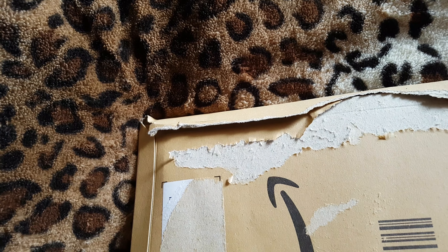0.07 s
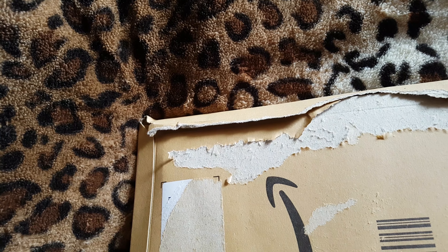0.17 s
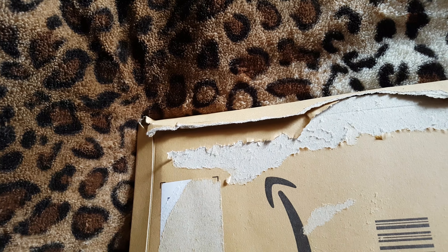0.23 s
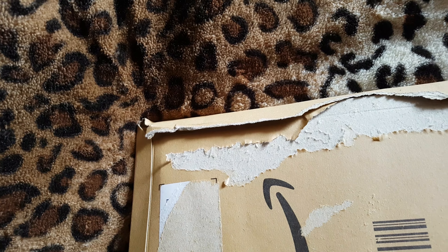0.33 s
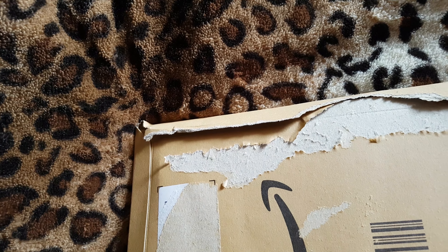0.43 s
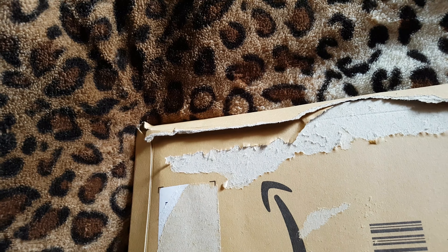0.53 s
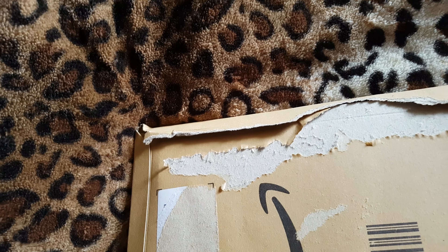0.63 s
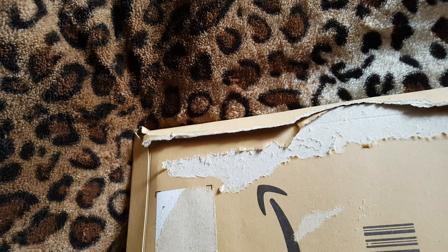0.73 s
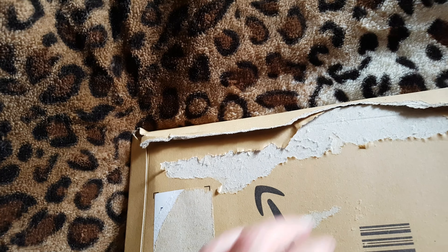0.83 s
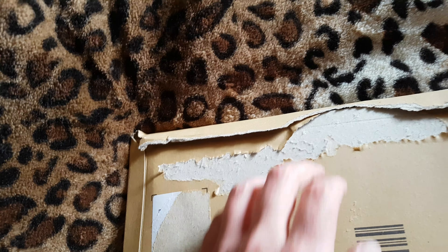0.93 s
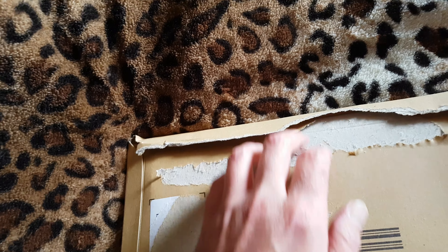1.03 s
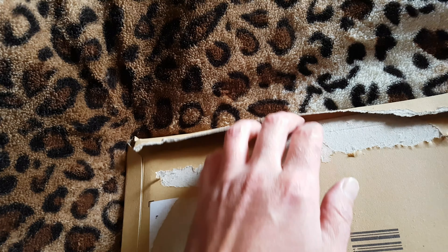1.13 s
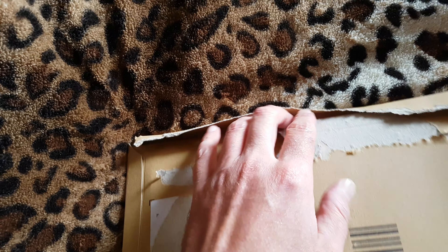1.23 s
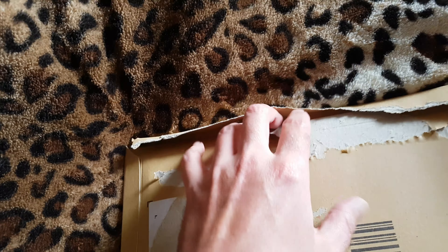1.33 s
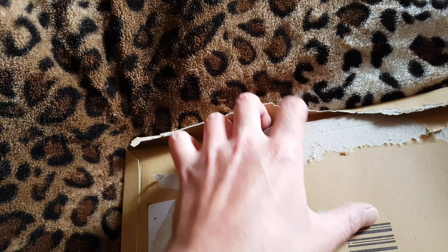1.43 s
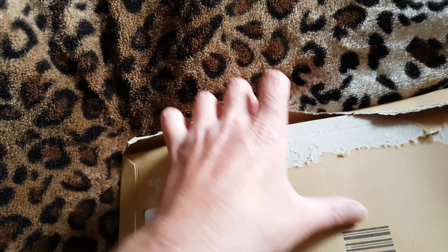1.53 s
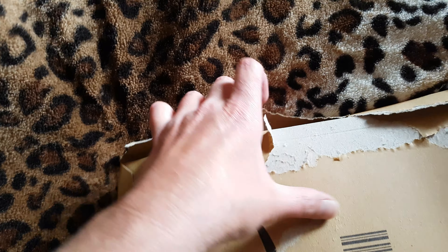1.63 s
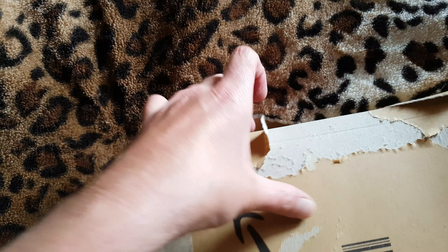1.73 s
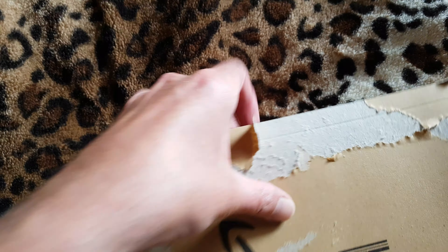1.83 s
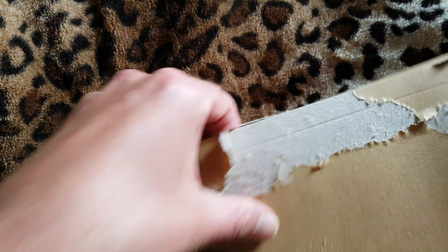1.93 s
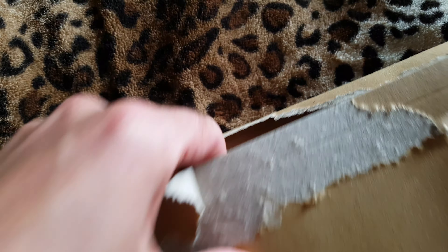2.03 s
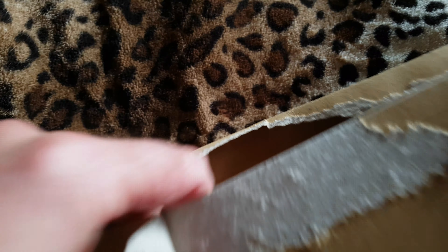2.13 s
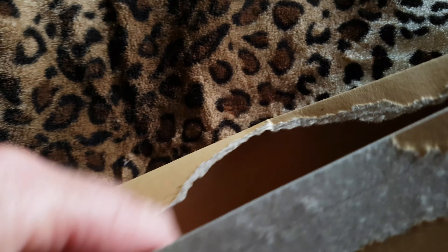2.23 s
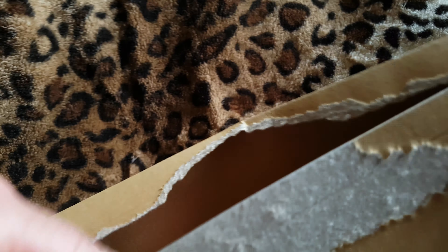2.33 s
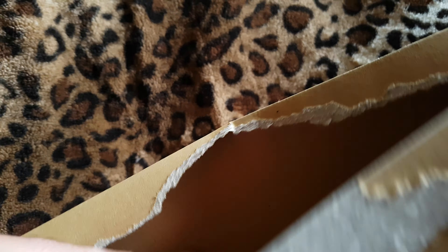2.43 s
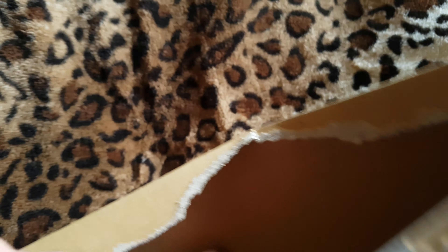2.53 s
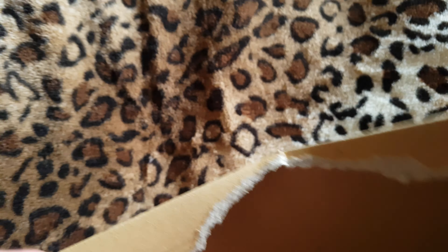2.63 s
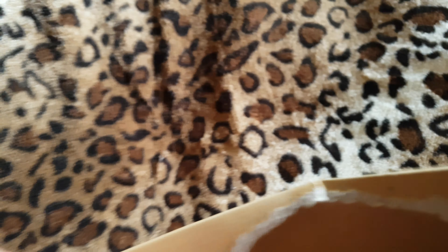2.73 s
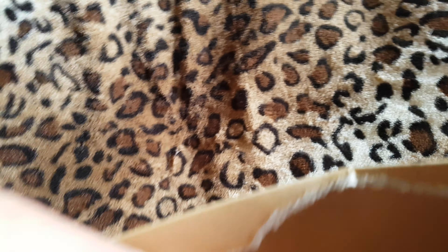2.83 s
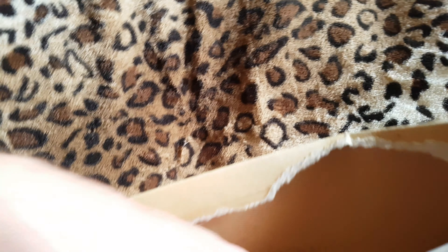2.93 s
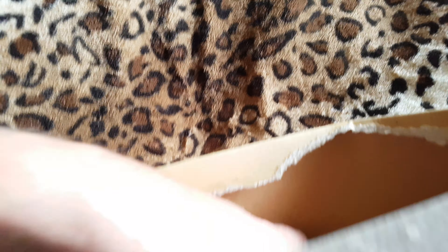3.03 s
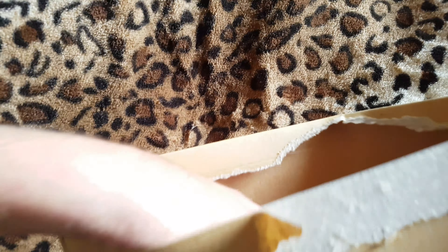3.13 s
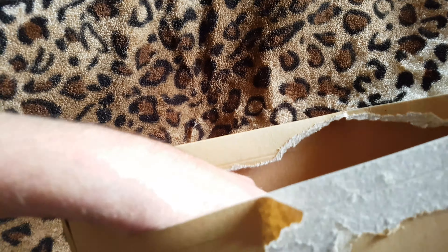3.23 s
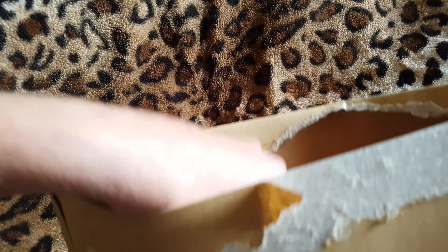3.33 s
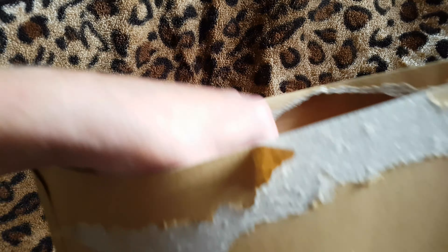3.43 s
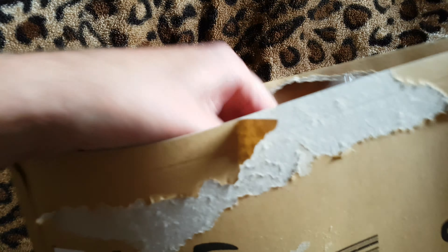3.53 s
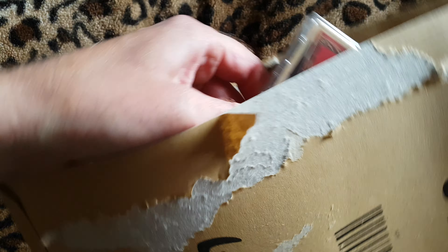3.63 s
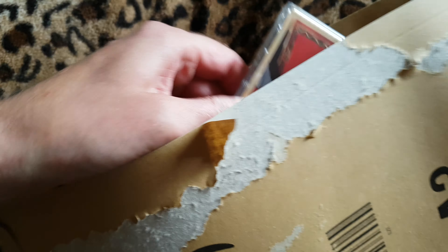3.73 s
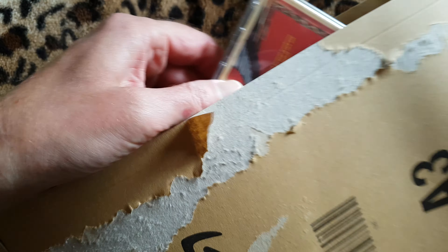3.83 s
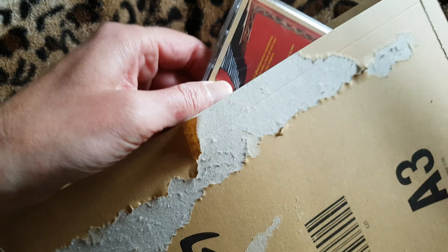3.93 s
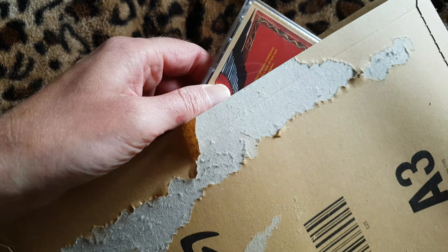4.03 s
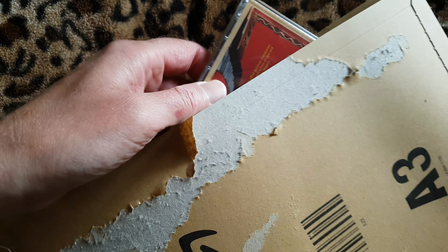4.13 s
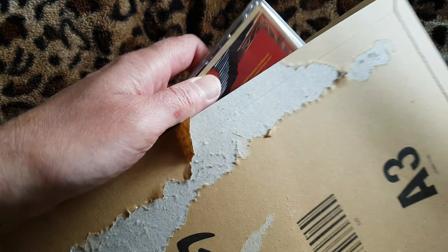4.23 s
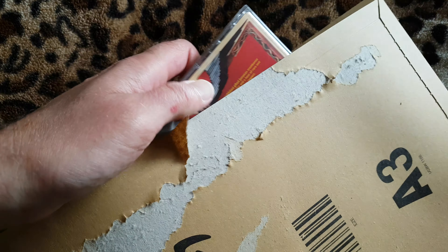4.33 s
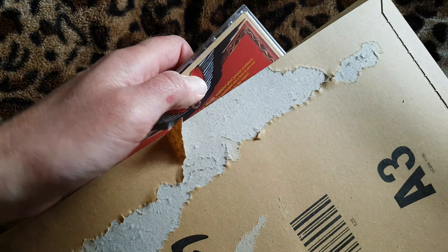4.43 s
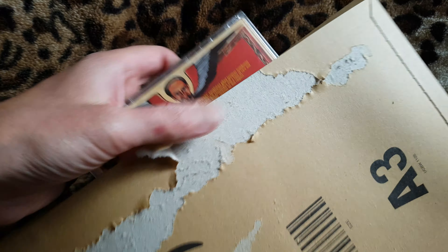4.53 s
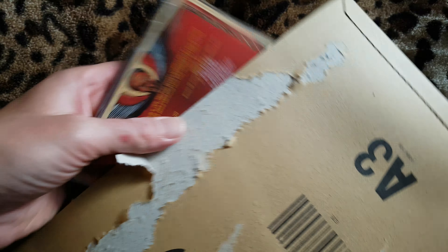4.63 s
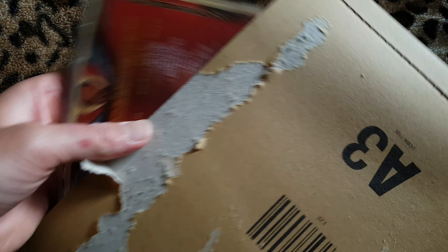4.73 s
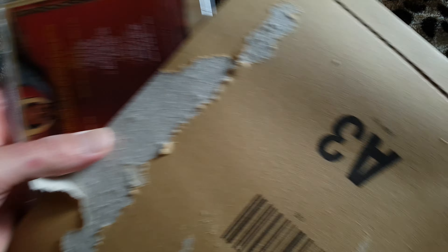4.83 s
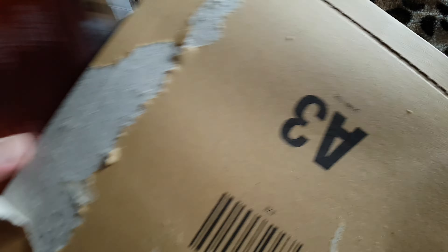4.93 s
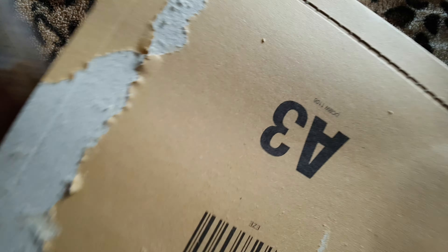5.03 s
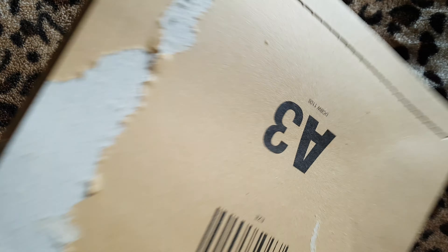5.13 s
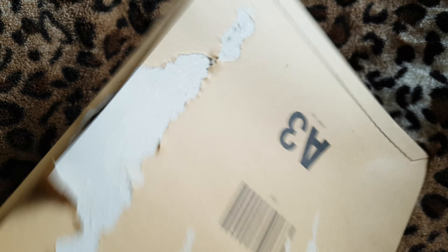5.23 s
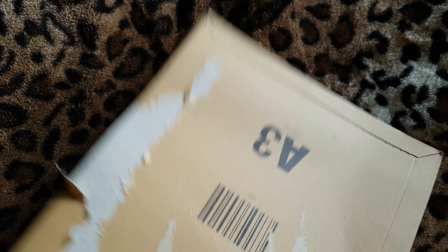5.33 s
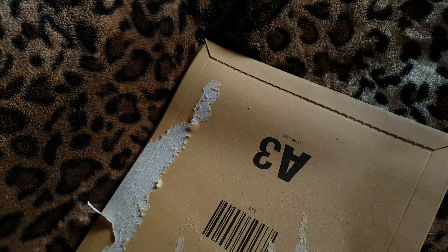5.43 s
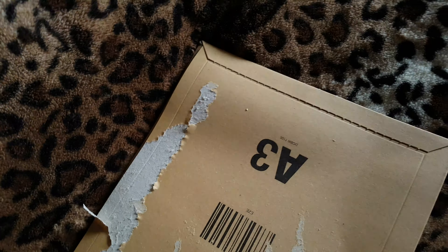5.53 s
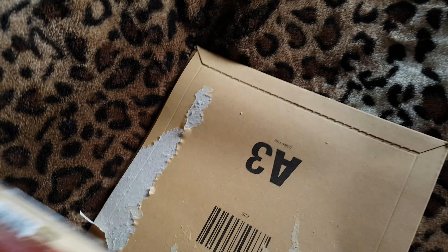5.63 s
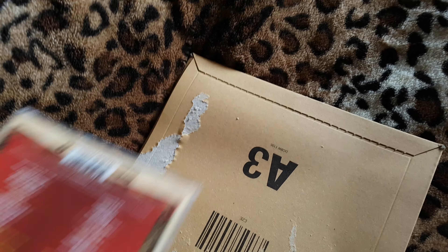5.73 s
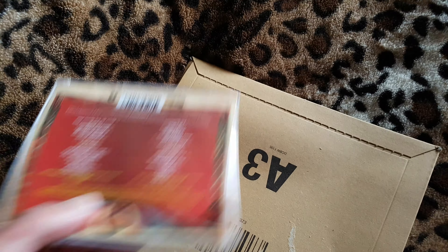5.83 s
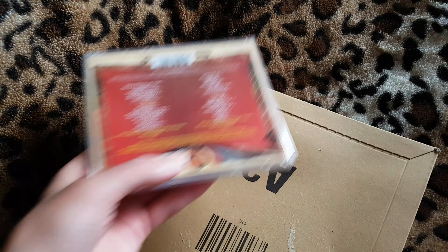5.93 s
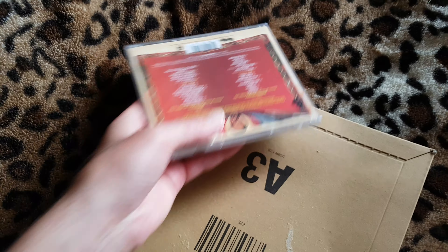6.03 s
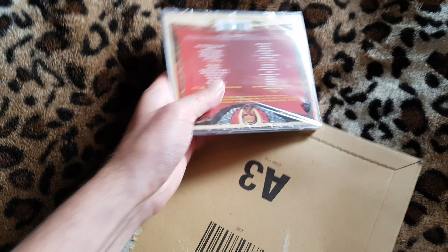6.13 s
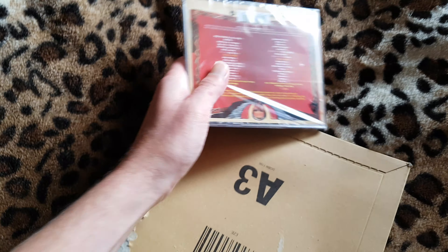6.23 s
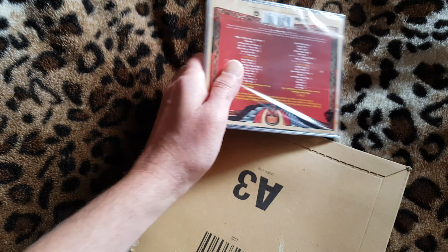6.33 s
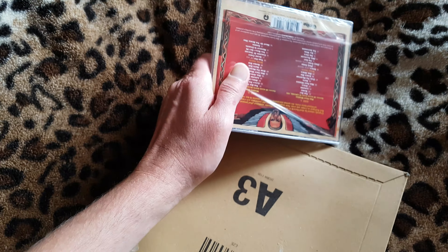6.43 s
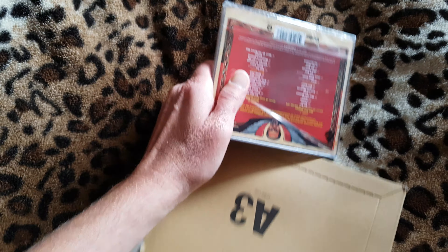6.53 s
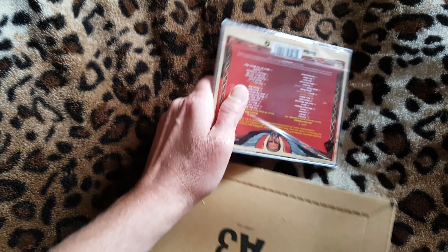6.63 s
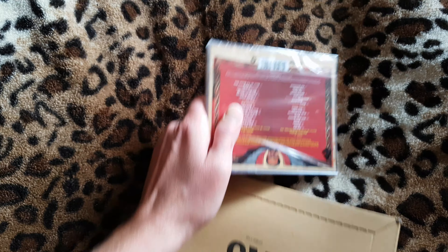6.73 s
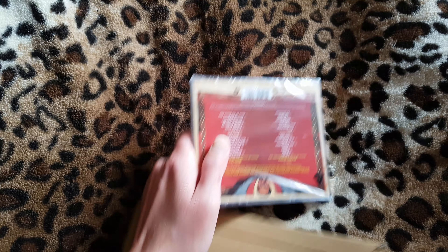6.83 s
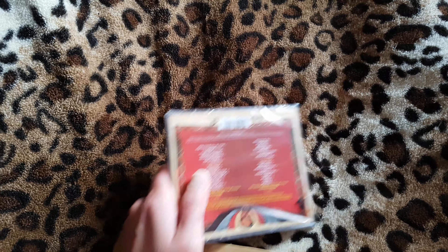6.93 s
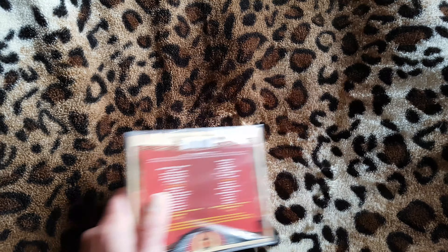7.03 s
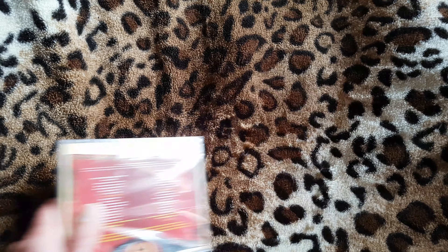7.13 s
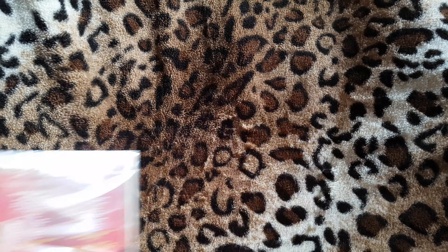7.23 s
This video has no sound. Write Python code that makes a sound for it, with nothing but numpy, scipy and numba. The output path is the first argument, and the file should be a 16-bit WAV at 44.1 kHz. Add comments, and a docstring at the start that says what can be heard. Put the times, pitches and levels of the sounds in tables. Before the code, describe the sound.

Dry cardboard rasps, hollow creaks and pops close up as a hand empties a stiff mailer, followed by light plastic film ticks in a quiet room.

```python
"""In a quiet room, a phone close to a blanket: a hand opens a torn cardboard mailer, slides out a film-wrapped
plastic case and lays both down. Room tone, hiss and a faint hum lie behind. Skin and case scrape the card as
stick-slip noise through its resonances; the card buckles and knocks as decaying modes with cracks; film and
paper edges tick as short treble bursts. A thin scratch comes before the hand; a short room tail follows all."""
import sys
import numpy as np
from scipy import signal
from scipy.fft import rfft, irfft, next_fast_len
from scipy.io import wavfile
from scipy.ndimage import uniform_filter1d
from numba import njit

SR = 44100
rng = np.random.default_rng(int(sys.argv[2]) if len(sys.argv) > 2 else 0)


def master_out(mix):
    """Clip the mix to full scale and print it as 16-bit PCM to the path in sys.argv[1]."""
    frames = np.transpose(np.atleast_2d(mix))
    ceiling = np.clip(frames, -1, 1)
    pcm = np.round(ceiling * 32767).astype(np.int16)
    wavfile.write(sys.argv[1], SR, pcm)


N = 321045
ALIKE_HZ = 1190  # above this the two microphone ports hear different parts of the card


def undb(db):
    """Decibels to gain."""
    return 10 ** (np.asarray(db) / 20)


def unit(x):
    """Scale to rms 1."""
    return x / np.sqrt(np.mean(x ** 2))


def curve(table):
    """Columns of a table, interpolated to one value a sample."""
    s, *columns = np.transpose(table)
    return [np.interp(np.arange(N) / SR, s, c) for c in columns]


def smooth(ms):
    """Millisecond values to one a sample."""
    return np.interp(np.arange(N) / SR, np.arange(len(ms)) / 1000, ms)


def walk(rate):
    """Random levels held 1 / rate s and slewed; spread near 1."""
    k = int(SR / rate)
    steps = np.repeat(rng.standard_normal(N // k + 1), k)
    return 1.09 * uniform_filter1d(steps, k)[:N]


def band(x, lo_hz, hi_hz, order=2):
    """Band-pass."""
    return signal.sosfilt(signal.butter(order, [lo_hz, hi_hz], "band", fs=SR, output="sos"), x)


def colour(x, points):
    """Shape dense noise by (Hz, dB) points, nearly silent outside them; rms 1."""
    hz, db = np.transpose(points)
    size = next_fast_len(N, True)
    f = np.arange(size // 2 + 1) * SR / size + 1
    gain = undb(np.interp(np.log(f), np.log(hz), db, -120, -120))
    return unit(irfft(rfft(x, size) * gain, size)[:, :N])


@njit
def svf(x, hz, width):
    """State-variable band-pass whose centre moves."""
    y, b, l = np.empty(len(x)), 0., 0.
    for i in range(len(x)):
        g, k = np.tan(np.pi * hz[i] / SR), width / hz[i]
        v = (b + g * (x[i] - l)) / (1 + g * (g + k))
        b, l, y[i] = 2 * v - b, l + 2 * g * v, k * v
    return y


def resonance(rub, hz, width_hz):
    """A steep moving resonance: two equal band-passes in a row; rms 1."""
    return unit(np.array([svf(svf(c, hz, width_hz), hz, width_hz) for c in rub]))


def ports(mid, side, alike_hz=ALIKE_HZ):
    """Left and right from two unrelated noises: nearly the same in the bass, unrelated in the treble."""
    high = signal.sosfilt(signal.butter(3, alike_hz, "high", fs=SR, output="sos"), side)
    side = high + 0.11 * side
    return np.array([mid + side, mid - side])


def pan(db):
    """Gains of left and right, from left minus right in dB."""
    return undb(np.array([db, -db]) / 2)


def slips(rate, spread_db, last_s, steady):
    """Envelope of stick-slip: random catches of uneven size that load and let go, over a steady drag."""
    catch = (rng.random(N) < rate / SR) * undb(spread_db * rng.standard_normal(N))
    t = np.arange(-.03, .03, 1 / SR)
    return unit(signal.fftconvolve(catch, np.exp(-np.abs(t) / last_s), "same") + steady)


def swells(s, db, rise_s, fall_s):
    """Power of each stroke, one value a millisecond: it climbs to its top and drops away."""
    late = np.arange(0, N / SR, .001) - s[:, None]
    far = np.where(late < 0, -late / rise_s[:, None], late / fall_s[:, None])
    # a bend above 1 gives a rounded top and steep ends
    return undb(2 * (db[:, None] - 20 * far ** 1.35))


def add(out, s, sound):
    """Mix a short sound in at time s."""
    i = int(s * SR)
    out[:, i:i + sound.shape[1]] += sound[:, :N - i]


def burst(t, lo_hz, hi_hz, t60, rise_s):
    """A puff of band noise that rises and decays, rms near 1 at its top."""
    shape = (1 - np.exp(-t / rise_s)) * 1000 ** (-t / t60)
    return unit(band(rng.standard_normal((2, len(t))), lo_hz, hi_hz)) * shape / shape.max()


# Room tone and microphone hiss behind everything. Each row: frequency in Hz, relative level in dB per Hz.
ROOM_SPECTRUM = [(20, -21.5), (30, -13), (55, -14), (110, -6), (170, -12), (300, -9.5), (1000, -12.5),
                 (2200, -15.5), (4000, -25.5), (7500, -31.5), (13000, -27.5), (16500, -23)]
ROOM_DB = -66.8
HUM_HZ, HUM_DB = 73, -81  # centres of its wandering pitch and amplitude


def room():
    """Steady noise of room and microphone, partly alike in the bass, with a faint wavering hum in the house."""
    mid, side = rng.standard_normal((2, N))
    noise = ports(mid, .6 * side, alike_hz=161.7) + .3 * np.array([side, -side])
    tone = colour(noise, ROOM_SPECTRUM)
    hum_hz = HUM_HZ * (1 + 0.055 * walk(9.6))
    hum = np.sin(2 * np.pi * np.cumsum(hum_hz) / SR) * undb(HUM_DB + 2.0 * walk(4))
    return undb(ROOM_DB) * tone + hum


ECHO_DB, ECHO_T60_S = -15, 0.057


def echo(x):
    """Short damped tail of a furnished room: decaying noise, nearly alike at both ports in the bass."""
    t = np.arange(int(.4 * SR)) / SR
    noise = band(ports(*rng.standard_normal((2, len(t)))), 130, 7500, order=1)
    tail = noise * 1000 ** (-t / ECHO_T60_S) * (t > .004)
    tail = tail / np.sqrt((tail ** 2).sum() / 2)
    return undb(ECHO_DB) * signal.fftconvolve(x, tail, axes=1)[:, :N]


# A faint thin scratch before the hand comes to the mailer.
# Each row: strongest moment in seconds, level in dB, 20 dB rise in seconds, 20 dB fall in seconds.
SCRATCH_STROKES = [(.17, -64, .033, .012), (.26, -66, .03, .1), (.314, -54, .07, .02)]
SCRATCH_HZ = 3400.


def scratch():
    """Short grainy patches: stick-slip noise through a fixed narrow band."""
    grain = slips(200, 5.1, 0.0011, steady=0.57) * rng.standard_normal((2, N))
    rasp = unit(np.array([svf(c, np.full(N, SCRATCH_HZ), 480.0) for c in grain]))
    power = swells(*np.transpose(SCRATCH_STROKES)).sum(axis=0)
    return rasp * smooth(np.sqrt(power))


# Film and paper edges tick close to the microphone.
# Each row: start in seconds, level in dB before a common trim, lower part in dB re that level before its
# own trim, left minus right in dB.
FILM_TICKS = [(1.1263, -49, -6, -6.0), (1.1378, -30, 7, -6.5), (1.168, -34, -8, -11), (1.261, -38, 0, 2),
              (2.1298, -42, 15, -4.0), (2.152, -36, 17.5, -3), (2.214, -31.5, -1, -2.0),
              (2.4486, -41.5, 14, -0.5), (2.509, -37, 8, 11), (2.5663, -38, 6, -5), (2.7347, -29, 0, 2.0),
              (2.7486, -28.5, 13, -2), (2.76, -28, 5, 3), (2.8744, -39, -5, -1.5), (2.8838, -31, -8, 2),
              (2.9025, -28.5, 2, 3), (2.9367, -40.5, 23.5, -1), (2.962, -29, -1, -2.0),
              (3.0547, -32.5, 1, -7), (3.5299, -42, -8, -0.5), (3.6356, -43, 5, 4), (3.8932, -29.5, 7.5, 0),
              (4.1828, -46, -13, 3), (4.207, -42, 0, 8), (4.2203, -39, -3, 8), (4.288, -34.5, -1, 4),
              (4.347, -38, 1, 1.5), (4.3695, -32.5, 5, 3), (4.3919, -41, -16, -3), (4.411, -43, -13, -0.5),
              (4.5136, -37, -16, 1), (4.588, -31, 1, -2), (4.6155, -33, -14, -3), (4.6468, -36, 1, 0.5),
              (4.6835, -36, 10, -3), (4.7601, -40.5, -12, -0.5), (4.823, -35, -1, -1.0),
              (4.855, -44, -10, 0), (4.913, -45, -10, 0), (4.921, -45, -10, 0), (4.939, -43, -8, 0),
              (5.077, -38, 7, 7), (5.1682, -36, -12, 4.0), (5.249, -43, -5, 8), (5.2623, -39, -3, 8),
              (5.3926, -50.5, 2, 1), (5.4455, -41, 3, 3.5), (5.4934, -36, -5, 5), (5.5413, -39.5, -1, 0),
              (5.59, -52, 8, 0), (5.6294, -38, 1.5, 0.5), (5.7357, -40, -5.5, -1.5), (5.7813, -44.5, 0, -3),
              (5.8215, -41, 4.5, 0.5), (5.833, -48, 8, 0), (5.863, -45, 5, -1), (5.888, -50, 10, 0),
              (6.027, -50, 6, -11.5), (6.0386, -42, -4, -6), (6.0794, -34, -10, 4), (6.0843, -29, -10, -8),
              (6.113, -40, -3, -4), (6.1357, -31.5, 0, -5), (6.1426, -34, -5, -7), (6.1659, -29.5, 8, 1),
              (6.233, -33.5, -2, -5), (6.348, -37.5, -3, -2), (6.6283, -44, 0, -2.5),
              (6.7778, -42.5, -5, -8.5), (6.8139, -30, -5, -6), (6.8568, -44, -11, 0), (6.902, -38, -3, -9),
              (7.2654, -36.5, -19, -2.5)]


def ticks():
    """Creases snap: a few milliseconds of treble with a duller part."""
    out, t = np.zeros((2, N)), np.arange(int(.03 * SR)) / SR
    for s, level_db, low_db, pan_db in FILM_TICKS:
        treble = burst(t, 7500, 19845, 0.0076, 0.0016)
        dull = burst(t, 1150, 3380, 0.011, 0.0025)
        snap = treble + undb(low_db - 2) * dull
        add(out, s, undb(level_db - 9.5) * pan(pan_db)[:, None] * snap)
    return out


# The card panel's modes, rubbed or struck. Each row: frequency in Hz before bending, relative level in dB,
# decay as a share of the given ring time.
CARD_MODES = [(127, -8.5, 1.27), (161.5, -5, 0.92), (236, -6.5, 1.1), (317, -5.5, 1.5), (484.6, 1.5, 0.59),
              (645.6, 3, 0.6), (815, -5.5, 0.79), (1111, -0.5, 0.85), (1238, 3, 0.45), (1568, -12.5, 1.9),
              (2090, 5.5, 0.4), (2537, 0.5, 0.4), (3460, -17, 0.42), (4100, -13, 0.16), (5060, -9, .4)]


def panels(rub, lo_hz, hi_hz, t60, turns_db):
    """Rubbing rings the card's modes; bending shifts each mode and the grip damps it by turns."""
    out = 0
    modes = [m for m in CARD_MODES if lo_hz < m[0] < hi_hz]
    for k, (hz, db, share) in enumerate(modes):
        bent_hz = hz * (1 + 0.0447 * walk(8.3))
        ring = np.array([svf(c, bent_hz, 2.35 / (t60 * share)) for c in rub])
        out = out + (-1) ** k * undb(db + turns_db * walk(18)) * unit(ring)
    return unit(out)


# How the hand holds the mailer, for knocks and scrapes alike. Each row: time in seconds, left minus right
# in dB in the treble, hollow of the mailer in Hz before its wander.
HAND_HOLD = [(1.0, -5, 950), (1.6, -6, 920), (1.85, -7, 740), (2.1, -6, 820), (2.64, 0, 730),
             (2.85, -4, 760), (3.5, -2, 880), (4.15, -5, 870), (4.8, -2.5, 920), (5.3, 0, 980),
             (5.7, -2, 850), (6.2, -3, 1080), (6.67, -5, 1100), (7.28, -3, 980)]
# The card buckles or is knocked. Each row: start in seconds, level in dB before a common trim, added ring in
# Hz before bending, bass in dB and crack in dB re that level, both before their own trims.
CARD_KNOCKS = [(1.062, -50, 990, -19, 6), (1.148, -40.5, 1290, -18, 0), (1.158, -30.5, 1176, -18, -2),
               (1.098, -44, 900, -20, 2), (1.209, -41, 1350, -22, 9), (1.265, -32, 1300, -29, -2),
               (1.351, -52, 760, -22, 9), (2.063, -29.5, 1220, -39, -2), (2.108, -26.5, 860, -22, -6),
               (2.143, -26.5, 625, -29, -8), (2.154, -24.5, 896, -16, -11), (2.212, -30, 573, -5.5, -7),
               (2.402, -36, 850, -31, -17), (2.47, -31, 790, -25, 0), (2.492, -30, 762, -19, -14),
               (2.508, -18.5, 753, -23, -7.5), (2.568, -25.5, 705, -21, 0), (2.709, -31, 810, -21, -2),
               (2.733, -29, 1580, -4.5, 6), (2.757, -14.5, 630, -21, -5.5), (2.829, -27, 750, -24, -3),
               (2.937, -24, 753, -9, 0), (3.096, -27, 682, -6, -9), (3.165, -36, 913, -19, -16),
               (3.368, -34, 910, -31, -8), (3.386, -30, 1550, -31, -4), (3.427, -33, 800, -25, -4),
               (3.636, -23, 832, -11, -4.5), (3.663, -31, 734, -25, -15), (3.706, -40, 480, -13, -3),
               (3.896, -31, 834, -25, 2), (3.911, -34, 1040, -26, 9), (4.068, -46, 350, -22, -1),
               (4.253, -30, 853, -15, -6.5), (4.287, -35.5, 950, -14, -12), (4.338, -30, 713, -25, -9),
               (4.365, -28, 555, -13, -2), (4.513, -45, 851, -13, -3.5), (4.587, -16, 954, -33, -5.5),
               (4.625, -27, 936, -32.5, -5), (5.349, -46, 1060, -30, -3), (5.735, -36, 985, -33, 7),
               (6.082, -53, 1360, -19, 14), (6.167, -24, 1260, -9, 8), (6.249, -51, 358, -20, 11),
               (6.625, -53, 1240, -15.5, -12), (6.921, -49.5, 358, -14.5, 3), (7.064, -46, 390, 2.5, -1)]
RING_T60_S, RING_DB = .032, 5.5  # the added ring: decay, and level on the modes' scale before its random size


def knocks():
    """Each blow rings the card's modes, bent a little, plus the added ring of that grip, and cracks."""
    out, t = np.zeros((2, N)), np.arange(int(.15 * SR)) / SR
    hz, db, share = np.transpose(CARD_MODES)
    hand_s, hand_db, _ = np.transpose(HAND_HOLD)
    fade = 1000 ** (-t / (RING_T60_S * np.append(share, 1)[:, None]))
    give = (1 - np.exp(-t / 0.00058)) ** 2  # the panel takes a moment to give
    for s, level_db, ring_hz, bass_db, crack_db in CARD_KNOCKS:
        bend, size, turn, start = rng.standard_normal((4, len(hz) + 1, 1))
        f = np.append(hz, ring_hz)[:, None] * (1 + 0.044 * bend)
        group_db = np.where(hz < 400, bass_db + 8, np.where(hz > 1500, crack_db, 0))
        gain = undb(np.append(db + group_db, RING_DB)[:, None] + 1.5 * size)
        # a buckle runs across the panel, so the modes start at uneven phases
        phase = 2 * np.pi * f * t + 0.67 * start
        # high modes reach the ports out of step
        lag = np.clip((f / ALIKE_HZ) ** 3, 0, 2) * turn / 2
        ring = np.array([(gain * fade * np.sin(phase + side * lag)).sum(axis=0) for side in (1, -1)])
        ring = band(ring * give, 70, 9000)
        crack = undb(crack_db - 11) * burst(t, 1200, 3640, .5 * RING_T60_S, 0.0018)
        crack = crack * pan(np.interp(s, hand_s, hand_db))[:, None]
        add(out, s, undb(level_db) * (0.69 * ring + crack))
    return out


# Rasp of the card fibres. Each row: frequency in Hz, relative level in dB per Hz.
FIBRE_SPECTRUM = [(710, -7), (1200, -16), (1580, -1.5), (2070, 1), (2290, -11.5), (3980, -8.5), (6000, -25),
                  (7800, -49.5), (13200, -120)]
# Hiss of the rubbing, above the rasp. Each row: frequency in Hz, relative level in dB per Hz.
HISS_SPECTRUM = [(2940, -38), (5000, -4.5), (6350, -25), (7940, -15), (12700, -5), (15200, -15.5),
                 (16000, -6)]
# Strokes of skin or case over the card, close to the phone. Each row: strongest moment in seconds, card body
# in dB, 20 dB rise in seconds, 20 dB fall in seconds, flexing bass in dB re body, fibres in dB re body,
# rasp of the torn edge in Hz before its wander, hiss in dB re body.
CARD_STROKES = [(1.071, -52.0, 0.028, 0.361, -14.0, 2.0, 1980.0, -13.5),
                (1.163, -61.0, 0.07, 0.079, 6.0, 10.5, 2020.0, 14.5),
                (1.268, -63.5, 0.025, 0.159, -5.0, 8.0, 2600.0, 4.0),
                (1.428, -51.5, 0.047, 0.058, -9.5, 3.0, 2300.0, -3.5),
                (1.621, -58.5, 0.096, 0.086, -11.0, 5.5, 2180.0, -5.5),
                (1.73, -51.5, 0.058, 0.159, -10.5, 4.5, 2830.0, -15.0),
                (1.814, -63.5, 0.106, 0.09, 5.5, 19.5, 2780.0, 9.0),
                (1.893, -41.0, 0.15, 0.033, -15.0, -4.0, 2800.0, -27.0),
                (2.031, -45.5, 0.091, 0.12, -16.5, -4.0, 1370.0, -18.0),
                (2.161, -39.5, 0.075, 0.207, -3.0, -6.5, 2200.0, -30.0),
                (2.272, -37.0, 0.116, 0.016, -25.0, -4.0, 1640.0, -32.5),
                (2.327, -40, 0.079, 0.045, -10.5, -4.0, 1670.0, -16.0),
                (2.413, -41.5, 0.075, 0.011, -7.0, -1.5, 1670.0, -14.5),
                (2.502, -36, 0.147, 0.14, -10.5, -7.0, 1660.0, -28.5),
                (2.644, -32.5, 0.11, 0.146, -25.0, -3.0, 1430.0, -32.0),
                (2.755, -33, 0.06, 0.05, -9, 1, 1430.0, -14),
                (2.835, -47.0, 0.61, 0.089, -2.0, -1.0, 1400.0, -21.5),
                (2.908, -50.5, 0.248, 0.033, -12.5, 2.5, 3060.0, 0.0),
                (2.936, -33.5, 0.011, 0.139, -10.5, -8, 3050.0, -23.0),
                (3.032, -57.0, 0.26, 0.116, 2.5, 9, 2900.0, 2.5),
                (3.165, -42.0, 0.249, 0.07, -8.0, -5.0, 1620.0, -12.5),
                (3.256, -55.5, 0.595, 0.019, -10.5, 0.5, 1620.0, -12.0),
                (3.377, -38.5, 0.074, 0.046, -31.5, -1.5, 1520.0, -20.0),
                (3.49, -28.5, 0.077, 0.026, -33.5, -4.5, 1660.0, -40.5),
                (3.521, -49.5, 0.203, 0.21, -13.5, -4.0, 1530.0, -9.0),
                (3.668, -41.5, 0.121, 0.033, -6.0, -9.0, 1400.0, -30.5),
                (3.71, -44.5, 0.02, 0.054, -3.5, -6.5, 3000.0, -17.5),
                (3.79, -44.5, 0.04, 0.047, -29.5, -11.5, 1400.0, -29.5),
                (3.895, -35.5, 0.107, 0.096, -11.0, -9.0, 2000.0, -21.5),
                (3.964, -37.0, 0.11, 0.016, -28.0, -9.5, 1830.0, -26.5),
                (4.08, -51.5, 0.031, 0.034, -8.0, -5.0, 1810.0, -28.5),
                (4.232, -51.5, 0.055, 0.046, -9.5, -1.5, 1800.0, -10.0),
                (4.296, -44.5, 0.046, 0.051, -3.5, -11.0, 1800.0, -32.5),
                (4.373, -37.5, 0.076, 0.034, -8, -7.0, 1980.0, -30.0),
                (4.41, -58.0, 0.414, 0.208, -4.0, -2.5, 1900.0, -16.5),
                (4.586, -46.0, 0.011, 0.231, -2, -3.0, 1400.0, -9.0),
                (4.698, -37.0, 0.087, 0.053, -30.0, -7.5, 2180.0, -22.5),
                (4.826, -43.0, 0.091, 0.046, -8, -10.0, 2570.0, -19.0),
                (4.906, -61.0, 0.017, 0.129, 3.0, -2.0, 2600.0, -8.5),
                (5.08, -52.5, 0.302, 0.183, -3.5, -5.5, 1390.0, -9.5),
                (5.1, -35.0, 0.067, 0.071, -24.0, -1.0, 1360.0, -15),
                (5.139, -43.0, 0.062, 0.028, -5.0, 9.5, 3750.0, 0),
                (5.258, -82.0, 0.078, 0.05, -2.5, 12.5, 3000.0, 18.0),
                (5.311, -58.0, 0.038, 0.07, -6.0, -2.5, 1400.0, -29.0),
                (5.479, -53.5, 0.068, 0.059, 1.0, 6.5, 1640.0, -5.0),
                (5.738, -72.0, 0.034, 0.084, 2.0, 12.5, 2570.0, 3.5),
                (5.833, -75.0, 0.011, 0.019, -5.0, 20.0, 2160.0, 11.0),
                (6.03, -66.5, 0.018, 0.026, -14.5, 8.0, 2160.0, 7.5),
                (6.142, -66, 0.036, 0.022, -4.0, 8.5, 2350.0, 15.5),
                (6.165, -51.5, 0.013, 0.14, 4.0, 3.0, 1530.0, -9.5),
                (6.298, -80.0, 0.269, 0.074, 7.0, 23.0, 2900.0, 20.0),
                (6.339, -56.5, 0.016, 0.031, -5.0, 1.5, 2810.0, -2.5),
                (6.545, -77.0, 0.027, 0.225, 10, 12.0, 2800.0, -1.0),
                (6.632, -55.5, 0.054, 0.011, -9.5, -6.5, 2790.0, -6.5),
                (6.675, -63.0, 0.046, 0.05, -3.0, 5.5, 2160.0, -8.5),
                (6.826, -69.0, 0.051, 0.011, -7.0, 3.5, 1970.0, 14.0),
                (6.93, -61.0, 0.192, 0.023, -11.5, 4.0, 2170.0, -4.0),
                (7.077, -66.5, 0.262, 0.062, -5.0, 8.5, 2100, 3.0),
                (7.143, -65.5, 0.057, 0.398, -6, 8.5, 2400, 1.5)]
FLEX_SHARE = .65  # share of the rise and fall: the card flexes only through the firm middle of a stroke
RASP_WANDER = .08  # share by which the rasp pitch wanders
BASS_PAN_DB = 3.5  # the left port hears more of the flexing


def scrape():
    """Friction noise in slips rings the hollow and the panels; fibres rasp and hiss above."""
    s, body_db, rise_s, fall_s, bass_db, fibre_db, edge_hz, hiss_db = np.transpose(CARD_STROKES)
    power = swells(s, body_db, rise_s, fall_s)

    def layer(db):
        """Envelope of one layer, from its level re body in each stroke."""
        return smooth(np.sqrt(undb(2 * db) @ power))

    # the stroke with the loudest fibres sets the rasp
    loudest = (undb(2 * fibre_db)[:, None] * power).argmax(axis=0)
    rasp_hz = smooth(edge_hz[loudest]) * (1 + RASP_WANDER * walk(25))
    flex_power = swells(s, body_db + bass_db, FLEX_SHARE * rise_s, FLEX_SHARE * fall_s)
    flex = smooth(np.sqrt(flex_power.sum(axis=0)))
    hand_db, hollow_hz = curve(HAND_HOLD)
    coarse = slips(70, 3.7, 0.0026, steady=1.7)
    fine = slips(300, 3.1, 0.00056, steady=2.8)

    drag = ports(*(coarse * rng.standard_normal((2, N))))
    hollow = resonance(drag, hollow_hz * (1 + .07 * walk(14)), 380.)
    body = unit(hollow + 0.99 * panels(drag, 400, 1500, t60=.014, turns_db=1.5))
    bass = panels(drag, 50, 400, t60=0.023, turns_db=3.0) * pan(BASS_PAN_DB)[:, None]

    rasp = ports(*(coarse ** .8 * fine * rng.standard_normal((2, N))))
    edge = resonance(rasp, rasp_hz, 900.) * (1800 / rasp_hz) ** .4  # a higher rasp is weaker
    card = panels(rasp, 1500, 6000, t60=0.011, turns_db=3.0)
    fibres = unit(colour(rasp, FIBRE_SPECTRUM) + 0.72 * card + 0.45 * edge)
    hiss = colour(coarse ** 0.48 * fine * rng.standard_normal((2, N)), HISS_SPECTRUM)
    treble = (layer(fibre_db) * fibres + layer(hiss_db) * hiss) * pan(hand_db)
    return layer(0 * s) * band(body, 330, 3600, order=1) + flex * bass + treble


def scene():
    """Close sounds, their tail, the room."""
    near = scratch() + ticks() + knocks() + scrape()
    return near + echo(near) + room()


def record(dry):
    """Nothing sounds above 15.8 kHz: a steep low-pass."""
    return signal.sosfilt(signal.ellip(10, .2, 60, 15800, fs=SR, output="sos"), dry)


dry = scene()
out = record(dry)
master_out(out)
```